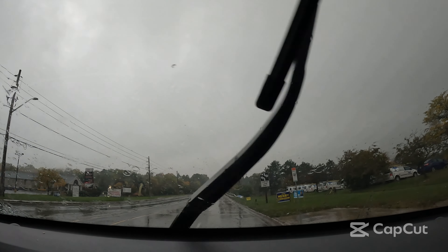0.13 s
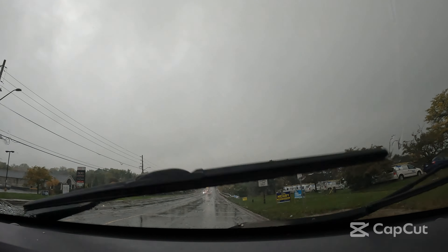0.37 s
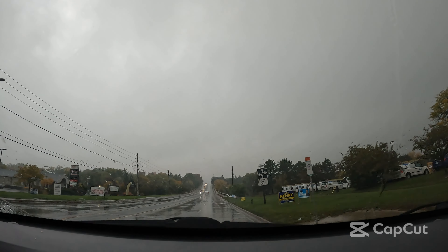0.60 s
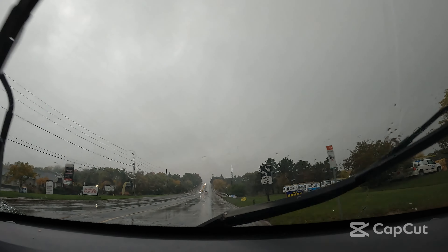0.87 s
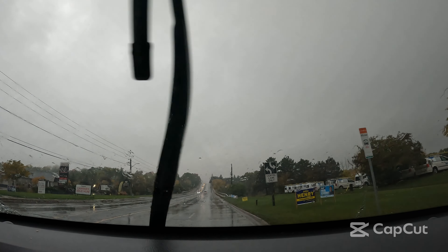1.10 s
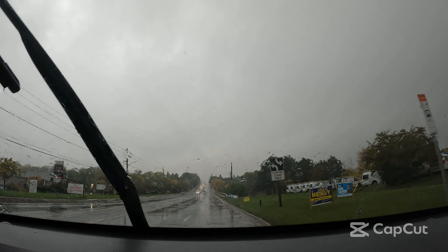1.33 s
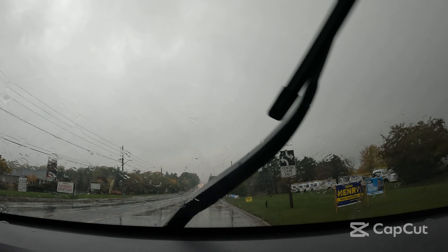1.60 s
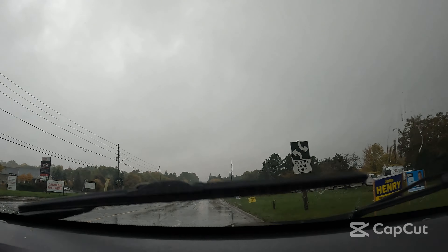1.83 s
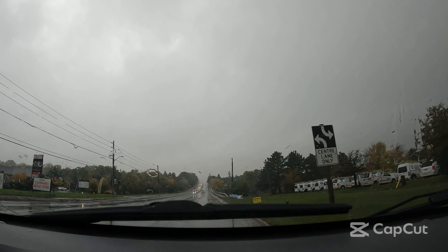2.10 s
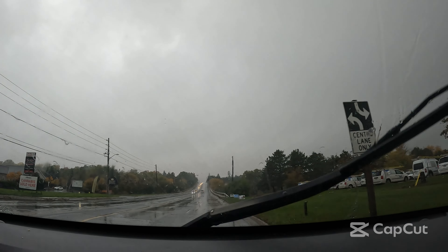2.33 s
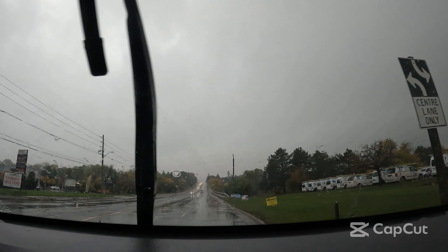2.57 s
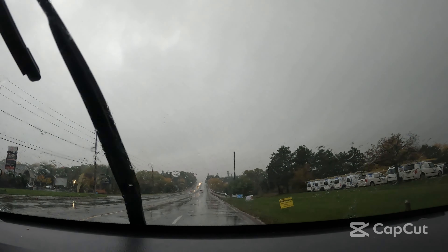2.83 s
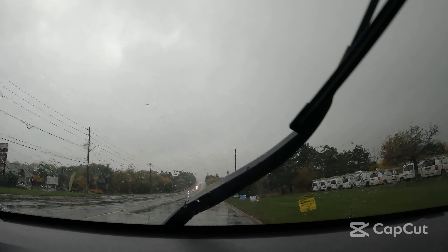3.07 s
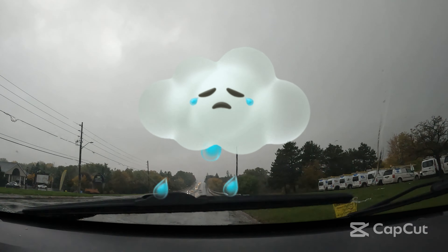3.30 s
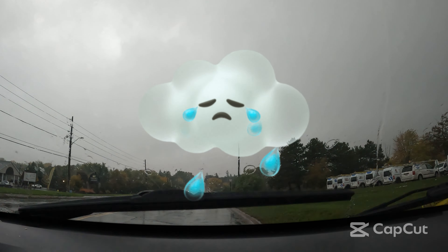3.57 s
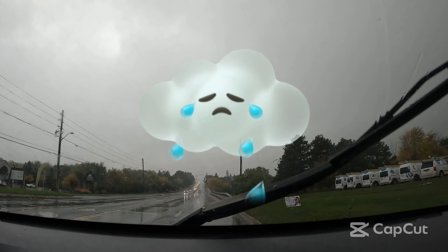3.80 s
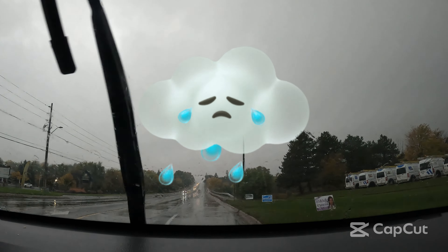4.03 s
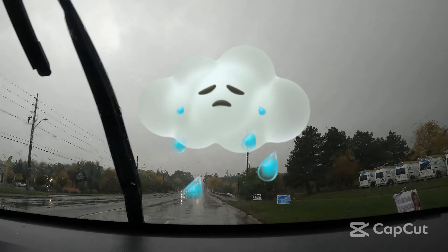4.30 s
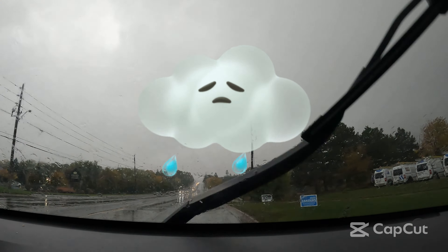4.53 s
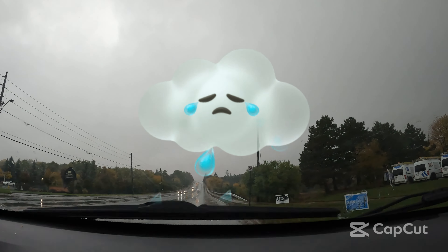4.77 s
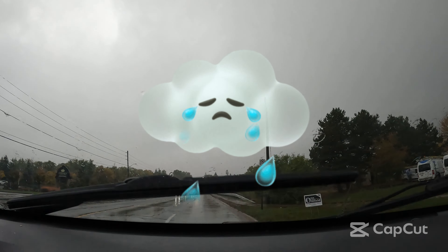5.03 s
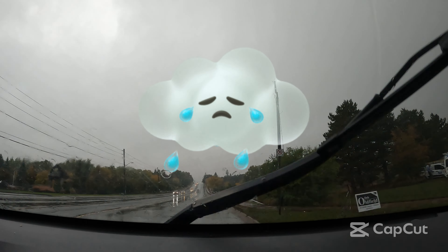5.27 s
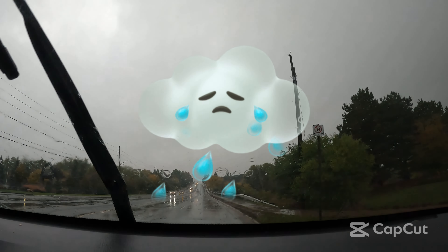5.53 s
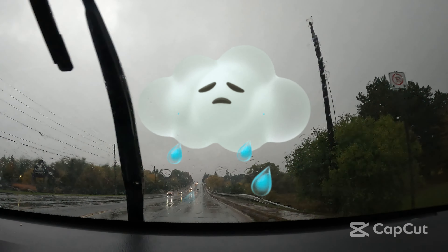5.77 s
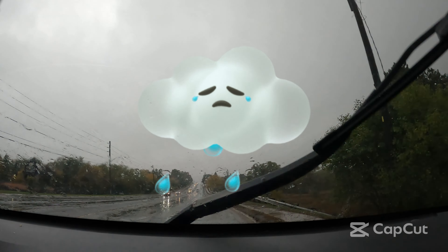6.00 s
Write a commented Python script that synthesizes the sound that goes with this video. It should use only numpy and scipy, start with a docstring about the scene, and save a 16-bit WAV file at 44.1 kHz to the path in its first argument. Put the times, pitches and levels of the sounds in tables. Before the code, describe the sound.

Deep unsteady road rumble fills a moving car while rain hisses and ticks on the windshield, with dull body knocks and rubbery wiper judders.

```python
"""Inside a car on a wet road in heavy rain, heard from the dashboard.
From the start the road shakes the cabin into a wavering boom (tones of wandering phase) over tyre roar, wet wash
and rain (shaped noise, ticks); a fine hiss tops the first quarter second and an engine hum fades by 2.5 s.
Large drops tick from 0.3 s, a loose part clicks at 0.37 s and dull knocks ring body panels from 0.55 s.
From 1.3 s to 5.7 s the wiper blades judder as they turn round, ringing arm and glass by stick and slip."""
import sys
import numpy as np
from scipy import signal
from scipy.fft import rfft, irfft, next_fast_len
from scipy.io import wavfile

SR = 44100
rng = np.random.default_rng(int(sys.argv[2]) if len(sys.argv) > 2 else 0)


def unload_wav(signal):
    """Save mono or channel-first audio to the path in sys.argv[1] as 16-bit WAV at rate SR, clipped to [-1, 1]."""
    wavfile.write(
        sys.argv[1],
        SR,
        np.round(np.clip(np.atleast_2d(signal).T, -1, 1) * 32767).astype(np.int16),
    )


def boost(x):
    """Linear amplitude factor 10**(x/20) for a level x in decibels (scalar or array-like)."""
    u = np.asarray(x, float) / 20
    return 10 ** u


N = 270333  # length [samples]


def rms_one(x):
    """Power normalisation: scale to unit mean square."""
    return x / np.sqrt(np.mean(x ** 2) + 1e-20)


def in_time(rows):
    """Linear interpolation: each column of a time curve, sample by sample."""
    s, *columns = np.transpose(rows)
    return [np.interp(np.arange(N) / SR, s, c) for c in columns]


def at_hz(points, hz):
    """Interpolation of a spectrum on a logarithmic frequency axis."""
    points = np.array(points)
    return np.interp(np.log(hz + 1), np.log(points[:, 0] + 1), points[:, 1])


def drift(rate_hz):
    """Low-passed noise: a slow random fluctuation of standard deviation 1."""
    r = np.exp(-80 * np.pi * rate_hz / SR)  # computed on every 40th sample
    slow = signal.lfilter([1], [1, -2 * r, r * r], rng.standard_normal(N // 40 + 2002))[2000:]
    return np.interp(np.arange(N) / 40, np.arange(len(slow)), rms_one(slow))


def ring(clicks, hz, t60):
    """Damped resonance: a unit click starts a sine of height 1 that falls 60 dB in t60 seconds."""
    r, w = boost(-60 / (t60 * SR)), 2 * np.pi * hz / SR
    return signal.lfilter([0, np.sin(w)], [1, -2 * r * np.cos(w), r * r], clicks + 1e-18)


def band_pass(x, order, low_hz, high_hz):
    """Band limitation: a Butterworth filter keeps what lies between two frequencies."""
    return signal.sosfilt(signal.butter(order, [low_hz, high_hz], "band", fs=SR, output="sos"), x)


def wavering(hz, level_db, waver):
    """Frequency modulation: a tone whose phase wanders; waver is the relative spread of its pitch."""
    cycles = np.cumsum(hz * (1 + waver * drift(6.03))) / SR
    return np.sqrt(2) * boost(level_db) * np.sin(2 * np.pi * cycles)


# correlation between the sides: (frequency [Hz], left-right likeness [0-1])
LIKENESS = [(60, 0.79), (110, 1), (150, 1), (380, 0.94), (940, 0.68), (2370, 0.65), (5930, 0.62),
            (14900, 0.61)]
# balance of the sides: (frequency [Hz], left minus right [dB])
LEANING = [(60, -2.5), (150, 0.5), (380, -0.5), (940, 4), (2370, 1), (5930, 1), (9000, 3.5), (14900, 4)]


def coloured(pair, spectrum, patchy_db, flicker_hz):
    """Partial coherence: two unrelated sources become a coloured stereo pair whose octaves flicker."""
    size = next_fast_len(N, real=True)
    hz = np.fft.rfftfreq(size, 1 / SR)
    alike = np.clip(at_hz(LIKENESS, hz), 0, 1)
    mid, side = rfft(pair, size) * boost(at_hz(spectrum, hz)) * np.sqrt([1 + alike, 1 - alike])
    ears = np.array([mid + side, mid - side]) * boost(np.outer([.5, -.5], at_hz(LEANING, hz)))
    out, octave = 0, np.log2(hz / 60 + 1e-9)
    for k in range(9):
        band = irfft(ears * np.clip(1 - abs(octave - k), 0, 1), size)[:, :N]
        out = out + boost(patchy_db * drift(flicker_hz)) * band
    return out / np.sqrt(np.mean(out.mean(axis=0) ** 2))


# pitch of the cabin boom: (time [s], frequency [Hz])
BOOM_PITCH = [(0.05, 42.65), (0.9, 46.72), (1.05, 40.68), (1.4, 46.17), (2.18, 50.36), (3.05, 43.79),
              (3.45, 48), (4.6, 49.46), (4.8, 41.96), (5.24, 50.04), (6.08, 46.7)]
# level of the cabin boom: (time [s], level [dB])
BOOM_LEVEL = [(0.05, -23.5), (0.44, -19.5), (0.53, -33), (0.75, -20), (0.89, -46), (0.92, -23.5),
              (1.28, -32), (1.33, -16), (1.68, -25.5), (1.73, -14.5), (1.8, -25.5), (1.93, -18.5),
              (2.0, -35), (2.1, -18.5), (2.75, -20.5), (2.82, -15), (3.09, -28.5), (3.12, -17.5),
              (4.03, -20), (4.23, -29.5), (4.3, -16), (4.7, -16.5), (4.75, -34.5), (4.87, -20), (5.84, -19),
              (6.08, -27)]
# level of the body shake below it: (time [s], level [dB])
SHAKE_LEVEL = [(0.05, -17.5), (0.13, -35.5), (0.53, -14), (0.75, -40.5), (0.8, -18.5), (1.69, -25.5),
               (1.81, -14.5), (2.05, -33), (2.28, -20.5), (4.6, -30), (5.05, -20.5), (5.12, -28.5),
               (6.03, -19.5), (6.08, -15.5)]


def boom():
    """Cavity resonance: the cabin air swings near one pitch, the body shakes about an octave lower."""
    (hz,), (boom_db,), (shake_db,) = in_time(BOOM_PITCH), in_time(BOOM_LEVEL), in_time(SHAKE_LEVEL)
    shake = wavering(25.0, shake_db + 3.5 * drift(14.3), waver=0.2107)
    both = wavering(hz, boom_db + 2.5 * drift(21.3), waver=0.06055) + shake
    sway = rms_one(ring(ring(rng.standard_normal(N), 30.0, 0.07), 50.0, 0.067))
    # the sway has opposite sign on the two sides
    return both * boost([[-1.3], [1.1]]) + boost(-32.5) * sway * [[1], [-1]]


# level of the tyre roar: (time [s], level [dB])
ROAD_LEVEL = [(0.1, -34.5), (0.5, -34.5), (1.2, -31), (1.72, -35), (2.14, -30.5), (2.82, -36), (3.78, -36),
              (4.32, -30.5), (4.8, -36.5), (5.29, -31), (6.05, -35.5)]
# spectrum of the tyre roar: (frequency [Hz], relative density [dB per Hz])
ROAD_SPECTRUM = [(35, -54), (60, -6), (76, -13.5), (130, -15.5), (165, -22), (221, -26), (274, -23),
                 (314, -32), (347, -29.5), (499, -39.5), (900, -49), (1170, -91.5), (1980, -120)]


def road():
    """Random excitation: tyre roar, a low rumble from the floor and a drone above it."""
    roar = coloured(rng.standard_normal((2, N)), ROAD_SPECTRUM, patchy_db=2.5, flicker_hz=18.3)
    return boost(in_time(ROAD_LEVEL)[0]) * roar


# strength of the rain: (time [s], level [dB])
RAIN_LEVEL = [(0.1, -50), (0.55, -54), (1.3, -50), (1.6, -51), (2.25, -49), (2.95, -53), (3.25, -51),
              (3.7, -51.5), (4.4, -50), (4.85, -52.5), (5.4, -50), (6.05, -52)]
# spectrum of the rain: (frequency [Hz], relative density [dB per Hz])
RAIN_SPECTRUM = [(290, -25), (500, -4), (745, -13.5), (940, -11), (1250, -13.5), (1400, -9.5), (1520, -3.5),
                 (2300, -6), (2950, -4.5), (3930, -9.5), (5200, -11.5), (7800, -20.5), (8300, -25),
                 (12300, -32.5), (15300, -56)]


def rain():
    """Shot noise: each drop is a tick with a short splash; far drops on the roof merge into hiss."""
    drops_per_s, spread_db, patter_s = 700, 5.0, 0.00048  # typical rate on each of two sources
    lands = rng.random((2, N)) < drops_per_s * boost(2.6 * drift(30)) / SR
    sizes = lands * boost(spread_db * np.minimum(rng.exponential(1, (2, N)), 3.2))
    fade = np.exp(-1 / (patter_s * SR))
    splash_power = signal.lfilter([1], [1, -2 * fade, fade ** 2], sizes ** 2)
    splash = splash_power ** .5 * rng.standard_normal((2, N))
    ticks = sizes * rng.choice([-1, 1], (2, N))
    far = 1.15 * rng.standard_normal((2, N))
    patter = rms_one(splash) + 0.12 * rms_one(ticks) + far
    return boost(in_time(RAIN_LEVEL)[0]) * coloured(patter, RAIN_SPECTRUM, patchy_db=1.95, flicker_hz=54)


# the largest drops: (time [s], relative level [dB], left minus right [dB])
DROPS = [(0.333, -36, 2), (0.7274, -36, 3.5), (0.962, -36, 0), (1.036, -50, -6), (1.089, -44, -3),
         (1.2675, -44, 18), (1.3782, -39, 3), (1.418, -38, -1), (1.8084, -36, -4), (1.9, -38, 1),
         (1.979, -44, -5), (2.292, -42, -1), (2.54, -41, 7), (2.68, -39, 5), (3.031, -39, 10),
         (3.717, -43, 5.5), (3.814, -46, -2), (4.051, -41.5, 8.5), (5.519, -52, 0), (5.548, -42.5, 9),
         (5.8455, -43.5, 10)]


def big_drops():
    """Impulse and noise burst: a sharp tick on the glass with a short splash, both band-passed bright."""
    peak_s, tick_share = 0.0012, 5
    s, level_db, pan_db = np.transpose(DROPS)
    hits = np.zeros((2, N))
    hits[:, (s * SR).astype(int)] = boost(level_db + np.outer([.5, -.5], pan_db) - 8)
    # envelope of the noise burst: a rounded rise and fall, highest after peak_s
    poles = [np.exp(-1 / (peak_s * SR))] * 2
    envelope = signal.lfilter([np.e / (peak_s * SR)], np.poly(poles), hits + 1e-18)
    noise = rng.standard_normal(N) + 0.35 * rng.standard_normal((2, N))
    return band_pass(tick_share * hits + envelope * noise, 2, 1800, 6500)


# level of the wet wash: (time [s], level [dB])
WASH_LEVEL = [(0.1, -55), (0.6, -58), (1.15, -51), (1.6, -56), (2.4, -51), (2.9, -57), (3.3, -55),
              (4.0, -51.5), (4.8, -55.5), (5.3, -50.5), (6.05, -55.5)]
# spectrum of the wash, fullest around 1 kHz: (frequency [Hz], relative density [dB per Hz])
WASH_SPECTRUM = [(500, -17), (750, 5.5), (950, 11.5), (1220, 12.5), (1420, 12.5), (1550, -6.5),
                 (2200, -33.5)]


def wash():
    """Band-shaped noise: the wet wash around 1 kHz, swelling and sinking."""
    noise = coloured(rng.standard_normal((2, N)), WASH_SPECTRUM, patchy_db=1.3, flicker_hz=51)
    return boost(in_time(WASH_LEVEL)[0]) * noise


# bursts of slips as the blades turn: (time [s], slip level [dB], length [s], brightness [dB per octave],
# low thump [dB], mean slip rate [1/s], place of the hardest slip [0-1], favoured note [Hz])
TURNS = [(1.309, -40, 0.03, -5, -24.5, 250, 0.8, 522.3), (1.337, -32.5, 0.026, -6, -34, 310, 0.73, 313),
         (2.202, -55, 0.085, -3, -37.5, 210, 0.4, 400), (2.75, -35.5, 0.038, -2.5, -26, 255, 0.5, 497),
         (2.786, -38.5, 0.022, -3, -30.5, 270, 0.24, 797), (3.67, -46, 0.083, -0.5, -49, 274, 0.03, 499.3),
         (4.208, -33, 0.044, 0, -20, 250, 0.4, 498), (5.123, -45, 0.08, 0.5, -38.5, 237, 0.4, 1195),
         (5.648, -36.5, 0.026, -0.5, -26.5, 252, 0.6, 500), (5.672, -31.5, 0.035, 0.5, -25.5, 227, .4, 928)]
# modes of arm and glass: (frequency [Hz], relative level [dB], t60 [s])
BLADE = [(313, -7.5, 0.098), (497, -4.5, 0.053), (640, -5, 0.045), (797, -9, 0.045), (925, -4, 0.029),
         (1220, -5, 0.035), (1394, -6, 0.031), (1780, -3, 0.006), (2080, -9, 0.0089), (2650, -6, 0.012),
         (3730, -22, 0.011)]


def wipers():
    """Stick-slip: bursts of half-regular slips of the rubber lip ring arm and glass, left of centre."""
    jitter, slip_scatter_db, mode_scatter_db = 0.11, 2, 3
    slowing = 0.08  # gaps grow from this share below their mean to as much above
    favour_db, favour_octaves = 4, 0.2  # lift of modes near the favoured note, and its width
    thump, scrape, t = np.zeros(N), np.zeros(N), np.arange(N) / SR
    chance = rng.standard_normal((len(TURNS), 2, 40))
    slips, force = np.zeros((len(TURNS), N)), np.zeros(N)
    for k, (s, level_db, length, bright_db, thump_db, per_s, crest, _) in enumerate(TURNS):
        even = np.cumsum(np.exp(jitter * chance[k, 0])) / per_s / length - 1 / per_s / length
        part = even * (1 + slowing * (even - 1))
        keep = part < 1
        at = np.minimum((s + np.maximum(part[keep], 0) * length) * SR, N - 1).astype(int)
        slips[k, at] = boost(level_db + slip_scatter_db * chance[k, 1][keep])
        force[at] = np.interp(part[keep], [0, np.clip(crest, .05, .95), 1], [.55, 1, .2])
        thump += boost(thump_db) * np.sin(np.pi * np.clip((t - s) / (length + 0.024), 0, 1))
        swell = np.sin(np.pi * np.clip((t - s) / length, 0, 1))
        scrape += boost(level_db + bright_db - 22) * swell
    # rubber dragging on glass between the slips
    drag = rms_one(band_pass(rng.standard_normal(N), 3, 1300, 3300))
    body = rms_one(ring(rng.standard_normal(N), 155.0, 0.046))
    out = thump * body + scrape * drag * boost([[2.0], [-2.0]])
    turns = np.array(TURNS)
    for k, (hz, level_db, t60) in enumerate(BLADE):
        nearness = np.exp(-(np.log2(hz / turns[:, 7]) / favour_octaves) ** 2)
        colour = boost(level_db + turns[:, 3] * np.log2(hz / 700) + favour_db * nearness)
        struck = colour @ slips * force ** (0.23 + hz / 1500)  # weak slips hardly reach the high modes
        lean_db = min(k * 1.0, 2.5)  # the higher modes come more from the left
        struck = struck * boost(mode_scatter_db * rng.standard_normal(N) - 1.5)
        out += ring(struck, hz, t60) * (-1) ** k * boost([[lean_db], [-lean_db]])
    return out


# knocks through the body: (time [s], relative level [dB], brightness [dB per octave])
KNOCKS = [(0.55, -34.5, 6), (0.979, -29.5, 6), (1.433, -39, -13), (1.469, -31.5, 6), (1.871, -33.5, 11),
          (1.999, -41, 5), (2.201, -27.5, 11), (2.263, -40, -9), (2.531, -30.5, 4), (3.063, -34.5, 6),
          (3.282, -31, 11.5), (3.442, -41, -9), (3.55, -35, -5.5), (3.672, -29.5, 7), (3.721, -32.5, -3),
          (4.138, -28, 7), (4.579, -31.5, 9), (4.805, -36.5, -12.5), (5.373, -34, 9), (5.718, -29.5, 10),
          (5.939, -35, -6)]
# panels that a knock rings: (frequency [Hz], relative level [dB], t60 [s])
PANELS = [(125.5, 3, 0.097), (218.3, 5.5, 0.05), (268.3, 5.5, 0.09), (307.3, 1, 0.1), (390.6, 3.5, 0.07),
          (444.8, 2.5, 0.05)]


def knocks():
    """Modal excitation: a blow with a short rattle rings every panel, each with a strength of its own."""
    rattle_s, rattle_db = 0.028, -33
    lag_cycles = 5.145  # the lower a panel, the later it answers
    s, level_db, bright_db = np.transpose(KNOCKS)
    scatter_db, out = rng.normal(0, 1.0, (len(s), len(PANELS))), np.zeros(N)
    for k, (hz, panel_db, t60) in enumerate(PANELS):
        clicks = np.zeros(N)
        lag_s = lag_cycles * max(1 / hz - 1 / PANELS[-1][0], 0)
        tilt_db = bright_db * np.log2(hz / 300)
        clicks[((s + lag_s) * SR).astype(int)] = boost(level_db + panel_db - 5.0 + tilt_db + scatter_db[:, k])
        decay = signal.lfilter([1], [1, -np.exp(-1 / (rattle_s * SR))], clicks + 1e-18)
        rattle = decay * rng.standard_normal(N)
        out += ring(clicks + boost(rattle_db) * rattle, hz, t60) * (-1) ** k
    return signal.lfilter([.01], [1, -1.8, .81], out)  # soft contact dulls the treble


# a loose part clicks: (time [s], level of the first puff [dB], first pitch [Hz], last pitch [Hz], fall [s])
CLICKS = [(0.3705, -46, 3300, 600, 0.008)]


def click():
    """Dispersion: a brief rough burst whose highs come first and lows last."""
    puff_s, decay_cycles, lows_louder_db = 0.0015, 2.2, 6
    out, t = np.zeros(N), np.arange(N) / SR
    for s, level_db, first_hz, last_hz, length in CLICKS:
        for part in np.linspace(0, 1, 7):
            hz = first_hz * (last_hz / first_hz) ** part
            puff = np.exp(-((t - s - part * length) / puff_s) ** 2) * rng.standard_normal(N)
            t60 = decay_cycles / hz
            band = ring(ring(puff, hz, t60), hz, t60)
            out += boost(level_db + lows_louder_db * part) * band / abs(band).max()
    return out


# engine hum while it pulls: (time [s], frequency [Hz], level [dB])
ENGINE = [(0.05, 87.8, -27), (0.4, 91.4, -53), (0.9, 95.7, -32), (1.801, 99.4, -39.5), (2.3, 105.6, -34)]


def engine():
    """Harmonic order: one clean tone of the engine, fading out as the foot lifts."""
    last_s, last_hz, _ = ENGINE[-1]
    hz, level_db = in_time(ENGINE + [(last_s + 0.2, last_hz, -70)])
    return wavering(hz, level_db, waver=0.0024)


# fine hiss on top of the rain at first: (time [s], level [dB])
SHEEN_LEVEL = [(0, -71.5), (.22, -66), (.27, -95)]


def sheen():
    """Band-limited noise: a fine bright hiss, partly shared by both sides."""
    noise = rng.standard_normal(N) + .5 * rng.standard_normal((2, N))
    return boost(in_time(SHEEN_LEVEL)[0]) * rms_one(band_pass(noise, 2, 8300, 12500))


def scene():
    """Superposition: all sources in the cabin add up."""
    weather = rain() + big_drops() + wash() + sheen()
    return boom() + road() + weather + wipers() + knocks() + click() + engine()


def roll_off(x):
    """The treble ends steeply here."""
    return signal.sosfilt(signal.butter(12, 15460, fs=SR, output="sos"), x)


def record(dry):
    """Soft saturation: peaks are rounded off by the same share on both sides."""
    swing = abs(dry).max(axis=0) / 0.74 + 1e-9
    mix = 1.258 * dry * np.tanh(swing) / swing
    return roll_off(mix)


dry = scene()
out = record(dry)
unload_wav(out)
```